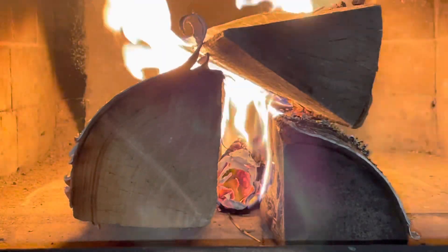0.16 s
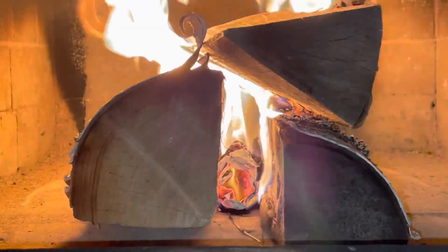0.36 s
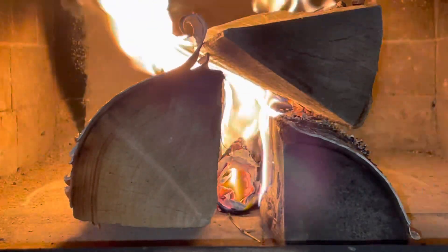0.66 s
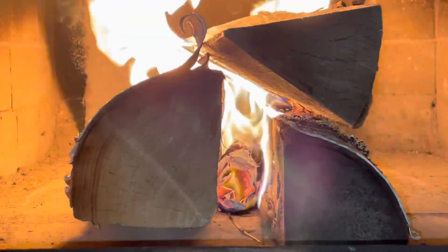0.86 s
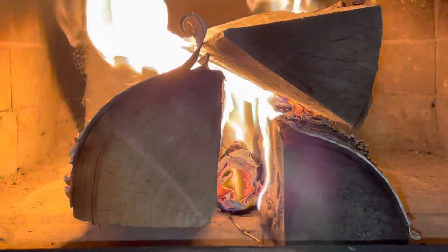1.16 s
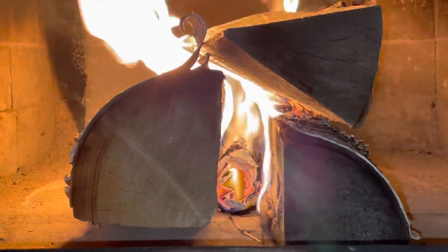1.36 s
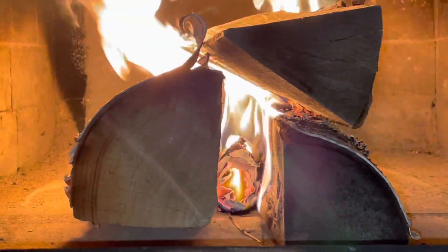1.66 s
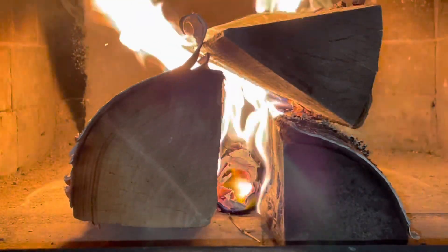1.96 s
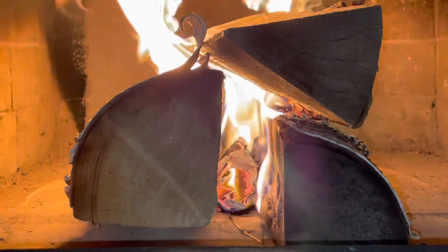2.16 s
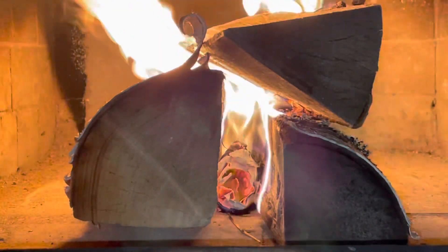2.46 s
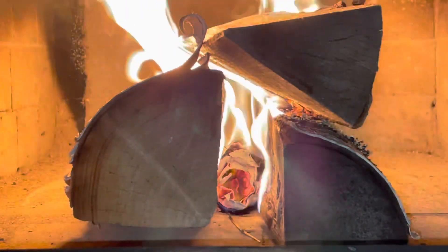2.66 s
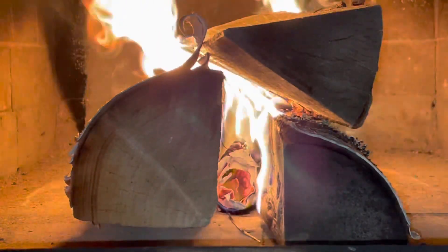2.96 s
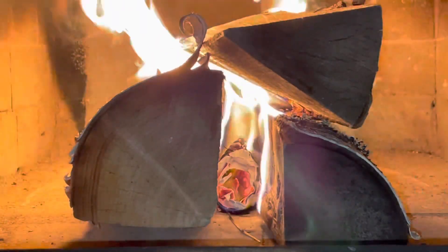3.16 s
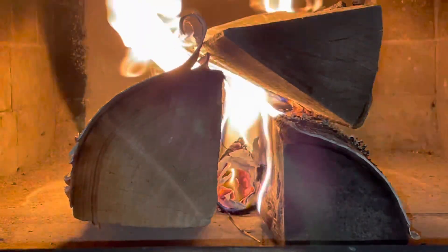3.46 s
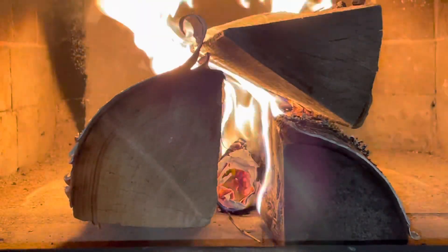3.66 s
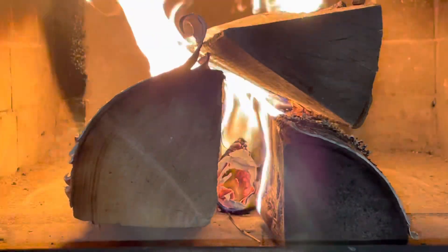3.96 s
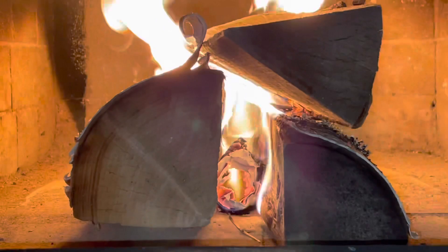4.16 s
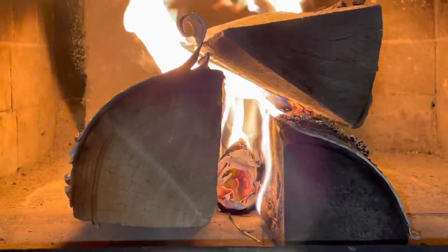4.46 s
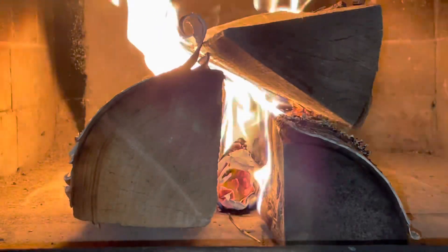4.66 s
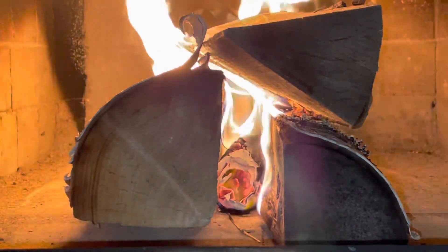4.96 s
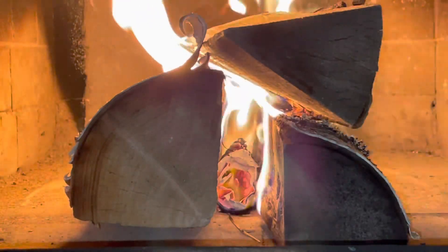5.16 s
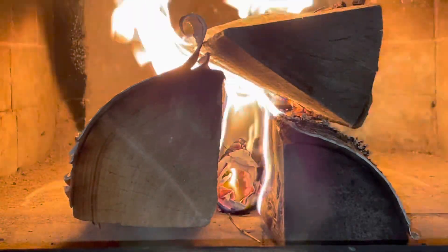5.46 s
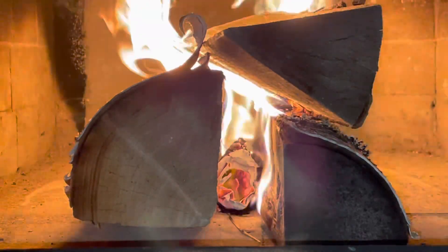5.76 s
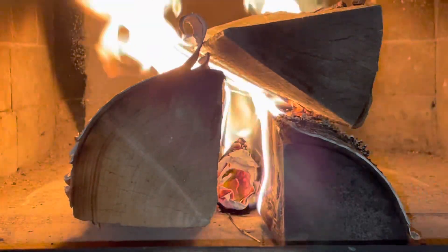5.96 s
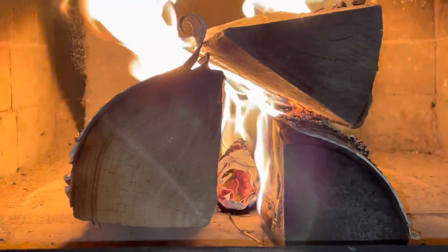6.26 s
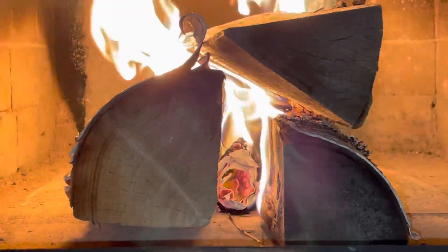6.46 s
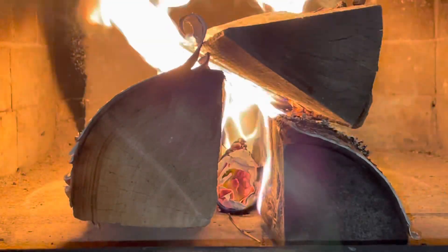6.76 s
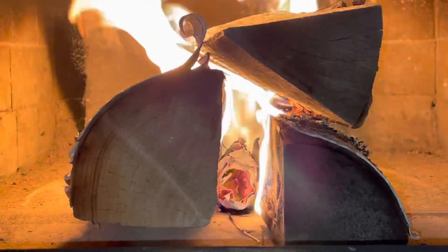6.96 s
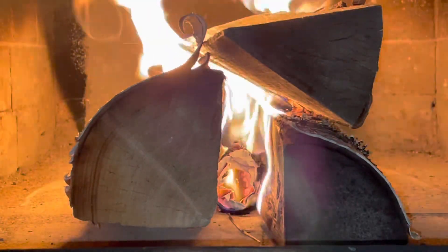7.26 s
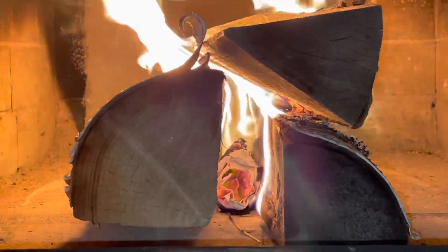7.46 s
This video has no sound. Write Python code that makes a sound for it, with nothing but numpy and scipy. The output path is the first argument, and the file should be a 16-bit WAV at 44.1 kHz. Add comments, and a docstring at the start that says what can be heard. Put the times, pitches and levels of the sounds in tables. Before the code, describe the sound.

Split logs burn close by in an open brick oven for about seven and a half seconds. A low flame rumble runs throughout, fluttering and surging unevenly, over a faint hiss and a soft, rapid, regular ticking. A sharp crackle snaps at 0.2 seconds, followed by a tiny, high, falling steam whistle. Similar faint whistles come near 1.1 and 2.5 seconds. The flames give soft, dull flaps, thickest between 1.2 and 1.8 seconds, with another crackle at 1.6. A brief hissing spurt of gas escapes at 2.8 seconds, then a small snap at 3. The clearest group of dry crackles falls between 4.4 and 5 seconds, with one more at 5.9, each with a very short reflection from the walls. Fainter crackles are scattered in between, and more flaps come from 6.5 to 7.4 seconds as the rumble continues to the end.

```python
"""Split logs burn in the open brick firebox of an oven, close to a phone. From the outset turbulent
flames rumble and flutter in the cavity, gas hisses from hot wood and something ticks softly behind.
Within a quarter second fibres snap in crackles that scatter between the walls, sap steam whistles
faintly and a sheet of flame tears off with a flap. The last whistle fades at 2.7 s, just before
a jet of wood gas spurts; crackles and flaps recur irregularly to the end."""
import sys
import numpy as np
from scipy import signal
from scipy.fft import rfft, irfft
from scipy.io import wavfile
from scipy.ndimage import uniform_filter1d

SR = 44100
rng = np.random.default_rng(int(sys.argv[2]) if len(sys.argv) > 2 else 0)


def inscribe(sig):
    """Save sig as 16-bit PCM at rate SR to the path in sys.argv[1].

    A 1-D sig is mono; a 2-D sig holds one channel per row.
    Samples are clipped to [-1, 1] before scaling.
    """
    pcm = np.round(np.clip(np.atleast_2d(sig).T, -1, 1) * 32767)
    wavfile.write(sys.argv[1], SR, pcm.astype(np.int16))


N = 335160
TIME = np.arange(N) / SR

# resonances and notches of the logs and their gaps (frequency [Hz], width [Hz], lift [dB])
LOG_MODES = [(716, 110, 6), (1530, 110, 2), (2030, 160, 3.5), (2380, 400, 3), (2950, 300, -3),
             (3600, 250, 1.5), (4100, 250, 4), (4700, 200, 4.5), (5020, 140, -7), (5400, 380, 5),
             (5950, 170, -7), (6330, 330, 5), (9070, 1900, 13.5), (11140, 520, -1)]


def undb(db):
    """Amplitude ratio of a level in decibels."""
    return 10 ** (np.asarray(db) / 20)


def unit(x):
    """Normalisation to an rms of 1."""
    return x / np.sqrt(np.mean(x ** 2))


def contour(points, hz):
    """Spectral envelope in dB, interpolated over log frequency."""
    point_hz, db = np.transpose(points)
    return np.interp(np.log(hz + 1), np.log(point_hz), db)


def colour(x, points, modes=()):
    """Minimum-phase filter: a broad envelope with a Lorentzian bump in dB for each resonance."""
    hz = np.fft.rfftfreq(len(x), 1 / SR)
    lift_db = sum(db / (1 + (2 * (hz - centre) / width) ** 2) for centre, width, db in modes)
    cepstrum = irfft(np.log(undb(contour(points, hz) + lift_db)), len(x))
    # folding the cepstrum onto positive time makes the filter causal
    cepstrum[1:len(x) // 2] *= 2
    cepstrum[len(x) // 2 + 1:] = 0
    return irfft(rfft(x) * np.exp(rfft(cepstrum)), len(x))


def walk(per_s):
    """Low-pass random modulation: held values, smoothed twice, with an rms of 1."""
    hold = max(int(SR / per_s), 1)
    steps = np.repeat(rng.standard_normal(N // hold + 1), hold)
    return unit(uniform_filter1d(uniform_filter1d(steps, hold), hold)[:N])


def even(x, span_s):
    """Division by the running rms holds the short-term power steady."""
    return x / np.sqrt(uniform_filter1d(x ** 2, int(span_s * SR)) + 1e-18)


def burst(x, db):
    """Energy normalisation: a transient gets the energy of 12 ms of sound at the given level."""
    return x * undb(db) / np.sqrt(np.sum(x ** 2) / (.012 * SR))


def add(out, start_s, x):
    """Linear superposition of x on out from a given time."""
    i = max(int(start_s * SR), 0)
    out[i:i + len(x)] += x[:N - i]


def flames():
    """Combustion noise: unsteady burning drives the cavity resonances; the tips flutter in puffs."""
    # spectra of the flame body and of the flame tips (frequency [Hz], spectral level [dB])
    rumble_spectrum = [(20, -49), (30, -36), (42, -14), (52, -5.5), (63, -5.5), (82, -5), (99, 1.4),
                       (116, -3), (133, 0), (160, -9), (183, -18.5), (260, -35.5), (500, -70)]
    flutter_spectrum = [(120, -29), (190, -3), (250, -0.5), (295, 2.5), (400, -7), (470, -7), (620, -13.5),
                        (700, -13), (820, -18), (1000, -24), (1500, -23.5), (3000, -50)]
    # standing waves between the brick walls (frequency [Hz], width [Hz], lift [dB])
    box_modes = [(201.7, 20.6, 7), (333.5, 13.7, 4.5), (473, 27, 5), (578, 42, 3), (693, 20, 7.5),
                 (722, 36, 3), (914, 37, 10.5), (1012, 30, 6), (1245, 57, 5.5)]
    # slow strength of the fire (time [s], relative body level [dB], relative tip level [dB])
    blaze = [(0, -44, -55.5), (.45, -41.5, -56.5), (.85, -38, -53), (1.049, -40, -55.5),
             (1.4, -40.5, -55.5), (1.7, -40, -54.5), (1.9, -41.5, -54.5), (2.2, -41, -53.5),
             (2.55, -40, -54.5), (2.92, -41.5, -56), (3.35, -42, -53.5), (3.6, -40.5, -55.5),
             (4.851, -44.5, -56.5), (5.1, -40, -53.5), (5.35, -43.5, -56), (6.0, -42.5, -54.5),
             (6.9, -41.5, -56), (7.6, -43, -56.5)]
    times, body_db, tips_db = np.transpose(blaze)
    body_surge, tips_surge = surges()
    dip_db = lulls()
    body = undb(np.interp(TIME, times, body_db) + dip_db + 2 * walk(per_s=24))
    tips = undb(np.interp(TIME, times, tips_db) + .17 * dip_db + 1.13 * walk(per_s=24))
    rumble = even(colour(rng.standard_normal(N), rumble_spectrum), span_s=.0518)
    puffs = rng.standard_normal(N) * undb(1.46 * walk(per_s=130))
    flutter = even(colour(puffs, flutter_spectrum, box_modes), span_s=.18)
    rumble *= undb(-.36) * np.hypot(body, body_surge)  # blaze and surge add in power
    flutter *= undb(1.61) * np.hypot(tips, tips_surge)
    return rumble + flutter


def surges(attack_s=.013, release_s=.012):
    """Amplitude envelopes of body and tips: a pocket of gas ignites, burns steadily and dies back."""
    # gas pockets (start [s], duration [s], relative body level [dB], relative tip level [dB])
    pockets = [(0.007, 0.039, -45, -55.5), (0.113, .017, -36.5, -62), (0.298, 0.055, -39, -53.5),
               (0.431, 0.077, -42, -52.5), (0.61, 0.031, -33.5, -52.5), (0.763, 0.048, -38.5, -58),
               (0.874, 0.026, -43, -71), (0.931, 0.0091, -30.5, -63), (1.08, 0.011, -42, -64),
               (1.128, 0.018, -38.5, -58), (1.194, 0.079, -35.5, -57.5), (1.403, 0.058, -40, -63),
               (1.509, 0.02, -33, -56), (1.57, 0.0086, -33.5, -52), (1.626, .055, -39, -54),
               (1.743, .012, -42, -66), (1.835, .012, -37.5, -60), (2.02, 0.012, -41, -66),
               (2.363, 0.015, -36, -66), (2.44, 0.059, -36.5, -60), (2.686, 0.093, -33.5, -53),
               (2.816, 0.031, -40, -54.5), (3.048, 0.045, -36, -60), (3.118, 0.022, -38, -59),
               (3.308, 0.043, -39.5, -57), (3.405, 0.048, -37, -58), (3.735, 0.016, -38.5, -61),
               (3.888, 0.021, -44, -73), (4.37, 0.047, -42, -63), (4.49, .02, -38.5, -64),
               (5.027, 0.02, -35, -55), (5.126, .013, -37, -69), (5.186, 0.041, -34.5, -70),
               (5.366, .034, -39, -58), (5.58, 0.036, -41, -61), (5.676, .033, -62, -58),
               (5.723, 0.035, -35.5, -58), (6.05, 0.054, -40, -67), (6.332, 0.0089, -34, -72),
               (6.447, .06, -43, -70), (6.723, .04, -42.5, -55.5), (6.808, 0.058, -41, -55.5),
               (7.043, 0.031, -38, -50), (7.24, 0.048, -38.5, -57), (7.321, 0.02, -38.5, -53),
               (7.39, 0.018, -34, -63), (7.515, .035, -43, -66)]
    body, tips = np.zeros((2, N))
    for start, length, body_db, tips_db in pockets:
        t = np.arange(-attack_s, length + release_s, 1 / SR)
        flare = np.interp(t, [-attack_s, 0, length, length + release_s], [0, 1, 1, 0])
        add(body, start - attack_s, undb(body_db) * flare)
        add(tips, start - attack_s, undb(tips_db) * flare)
    return body, tips


def lulls():
    """Amplitude modulation in dB: between surges the flames sink in rounded troughs."""
    # dips in the burning (start [s], duration [s], depth [dB])
    troughs = [(0.133, .05, -4), (.37, 0.052, -7), (.57, .035, -5), (0.694, 0.03, -12), (0.898, .03, -14),
               (1.032, .04, -4), (1.1, 0.033, -7), (1.153, .03, -6), (1.378, 0.032, -15), (1.54, .03, -4),
               (1.755, 0.032, -10), (1.862, 0.078, -7), (2.047, 0.11, -2.5), (2.65, 0.041, -0.5),
               (2.874, 0.043, -8), (3.17, .1, -5), (3.35, 0.04, -6), (3.549, 0.043, -8), (4.262, .05, -9),
               (4.43, 0.04, -4), (4.537, 0.15, -2), (5.248, 0.068, -4.5), (5.852, 0.052, -10),
               (6.2, .11, -1), (7.01, 0.045, -7)]
    dip_db = np.zeros(N)
    for start, length, depth_db in troughs:
        add(dip_db, start, depth_db * np.sqrt(np.hanning(int(length * SR))))
    return dip_db


def hiss(ticks_per_s=22, tick_decay_s=.0034):
    """Flow noise of gas leaving hot wood, with the shot noise of tiny ticks from the embers."""
    # hiss of hot wood and draught (frequency [Hz], spectral level [dB])
    spectrum = [(300, 1), (900, 4), (1250, -1), (1600, 2), (1830, 6.5), (2250, 4.5), (2600, 1.5),
                (3500, -3), (6000, -5.5), (7200, -6), (8700, -5), (11500, -7.5), (13200, -8.5), (14200, -9),
                (15800, -9.5)]
    # resonances and notches of the hiss (frequency [Hz], width [Hz], lift [dB])
    modes = [(1590, 70, -3.5), (1693, 25, 3), (1836, 42, 5), (1929, 25, 2.5), (2970, 40, 5), (3430, 150, 3),
             (3920, 80, 2), (4160, 220, 5.3), (4540, 130, 1), (5310, 90, 4), (5800, 67, -3),
             (11350, 400, 3.5)]
    gas = unit(colour(rng.standard_normal(N), spectrum, modes))
    gas *= undb(.23 * walk(per_s=2.9) + .76 * walk(per_s=40))
    impulses = (rng.random(N) < ticks_per_s / SR) * rng.standard_normal(N)
    t = TIME[:SR // 40]
    tick = rng.standard_normal(len(t)) * np.exp(-t / tick_decay_s)
    ticks = signal.fftconvolve(impulses, tick)[:N]
    ember_spectrum = [(900, -30), (2200, -4), (5500, 7), (8000, 7), (15000, .5)]
    embers = unit(colour(ticks, ember_spectrum, LOG_MODES))
    return undb(-63) * gas + undb(-81.5) * embers


def rush(spurt_at_s=2.787, spurt_length_s=.06, spurt_db=-55.5):
    """Jet noise: a broad stream of wood gas wavers under the hiss and spurts once."""
    # jet of wood gas (frequency [Hz], spectral level [dB])
    spectrum = [(1000, -24), (1650, -14), (1850, 1.5), (2000, -5), (2200, 2.5), (2350, -13.5), (2600, -2),
                (3200, -16.5), (6000, -32.5)]
    spurt = np.zeros(N)
    add(spurt, spurt_at_s, undb(spurt_db) * np.linspace(1, 0, int(spurt_length_s * SR)))
    jet = unit(colour(rng.standard_normal(N), spectrum))
    waver = undb(-74 + 2.5 * walk(per_s=9))
    return jet * np.hypot(waver, spurt)


def ticking(turns_per_s=15, decay_s=.0041, size=2048):
    """Periodic excitation, perhaps by a fan: knocks recur on every turn, each a damped oscillation."""
    # knocks within one turn (time into the turn [s], mean level [dB], mean frequency [Hz])
    knocks = [(.0015, -62.5, 770), (.032, -71, 770), (0.049, -102, 1170)]
    out, t = np.zeros(N), TIME[:size]
    for offset_s, db, hz in knocks:
        for start in np.arange(offset_s, N / SR, 1 / turns_per_s):
            force_db, detune = rng.standard_normal(2) * (1.2, .015)
            ring = np.sin(2 * np.pi * hz * (1 + detune) * t) * t * np.exp(-t / decay_s)
            add(out, start, burst(ring, db + force_db))
    return out


def crackles(fracture=2.7, size=4096):
    """Impulse excitation: a fibre breaks and tears on, the splinter rings, the walls scatter the snap."""
    # snapping fibres (time [s], relative level [dB], woody knock [dB], treble [dB],
    # splinter resonance [Hz], decay time of the tear [s])
    snaps = [ (0.1595, -64, -9, 3, 6000, .0009), (0.2217, -47.5, -7, 6.5, 5400, 0.003),
             (0.242, -61, -5, 4, 5400, 0.0013), (0.734, -66.5, -5, 1, 5200, 0.002),
             (.868, -63.5, -11, -9, 5260, 0.0022), (1.0762, -67, -22, 3, 5160, 0.00083),
             (1.373, -64, -14, -5, 5290, 0.0035), (1.5315, -71, 0, 2, 5400, .001),
             (1.5714, -53.5, -13, -12, 5900, 0.0043), (1.7455, -75, -2, 5, 5400, .001),
             (1.7953, -72, 0, 6, 4400, .002), (2.306, -61, -14, -10, 6600, 0.002),
             (2.5754, -68.5, -1, 4, 5600, .0012), (2.9721, -58, -3, 3, 5450, 0.00039),
             (2.9977, -71, -6, 5, 5400, .002), (3.131, -75, -3, 6, 5500, .0006),
             (3.2674, -68, -9, 0, 6430, .001), (3.884, -67, -15, -10, 4680, .001),
             (3.9827, -67, 2, 4, 5400, 0.0011), (4.056, -65, -2, -9, 5400, .003),
             (4.3134, -73, -9, 6, 5500, .001), (4.4663, -49, -5, 4.5, 5450, 0.0016),
             (4.623, -53, -6.5, -1.5, 5400, 0.0019), (4.8486, -57, -2, 2.5, 4770, 0.0013),
             (4.8696, -63.5, 3.5, -1, 2300, 0.004), (4.993, -54.5, -7, 0, 5370, 0.0013),
             (5.5473, -63, -3, 2, 5570, .002), (5.7252, -69.5, 5, 4, 2920, .001),
             (5.9323, -56.5, 0, -5, 5600, 0.0043), (6.1238, -66.5, 0, -4, 5200, .0018),
             (6.1603, -64.5, -8, 4, 5530, 0.00078), (6.3574, -68, 3, 1, 3250, .0014),
             (7.018, -69.5, -9, 2, 4160, .001), (7.384, -74, 10.5, -8, 2800, .0013)]
    out, t = np.zeros(N), TIME[:size]
    echo_envelope = undb(-5) * np.exp(-t / .0049) + undb(-35) * np.exp(-t / .035)
    # the soft puffs of hiss pass through the same filters as the snaps
    for start, db, knock_db, treble_db, splinter_hz, tear_s in snaps + hiss_puffs():
        tear, walls = rng.standard_normal((2, size))
        tear *= np.exp(-t / tear_s)
        tear[0] += fracture
        # the small fracture radiates mostly treble; the woody lows come later, from log and walls
        snap = colour(tear, [(2000, -5), (5000, 0)]) + walls * echo_envelope
        knock = [(300, knock_db - 8), (700, knock_db - 2), (1300, knock_db - 2),
                 (2400, knock_db + 5.5), (3500, knock_db + 6)]
        ring = [(4900, 1), (6500, 1)]
        treble = [(9000, treble_db - 9.5), (12000, treble_db - .5), (15800, treble_db - 2), (18000, -24)]
        crackle = colour(snap, knock + ring + treble, LOG_MODES + [(splinter_hz, 550, 3)])
        # knock and treble add their power to that of the ring
        total_db = db + 10 * np.log10(1 + undb(knock_db) ** 2 + undb(treble_db) ** 2)
        add(out, start, burst(crackle, total_db + .5))
    return out


def hiss_puffs(per_s=1.3, count=40):
    """A Poisson process: rows for faint, soft puffs of hiss, each about a tenth of a second long."""
    decay_s = -3.5  # long and negative: the noise stays almost level until it is cut off
    times = np.cumsum(rng.exponential(1 / per_s, count))
    spread = rng.uniform(-.83, 1, (count, 4))
    return [(start, -75 + 3 * level, 1 + 6 * lows, -6 + 6 * treble, 5200 * 1.1 ** pitch, decay_s)
            for start, (level, lows, treble, pitch) in zip(times, spread) if start < N / SR]


def whistles(jitter=.005, wander=.007, sputter_db=3.5):
    """Jet tones: sap steam sputters from the end grain in a fizz, its pitch falling with its pressure."""
    # steam jets (start [s], duration [s], first pitch [Hz], last pitch [Hz], relative level [dB])
    jets = [(.245, .12, 5680, 5200, -72.5), (1.07, .24, 5150, 4570, -76), (1.745, .045, 5840, 5500, -79),
            (2.468, .1, 5880, 5560, -75.5), (2.6, .11, 5920, 5480, -78)]
    out = np.zeros(N)
    fizz_spectrum = [(1500, 0), (5500, -4), (12000, 1), (17000, -33)]
    fizz = undb(1) * unit(colour(rng.standard_normal(N), fizz_spectrum))
    for start, length, first_hz, last_hz, db in jets:
        n = int(length * SR)
        unsteadiness = 1 + jitter * walk(per_s=500)[:n] + wander * walk(per_s=50)[:n]
        hz = np.linspace(first_hz, last_hz, n) * unsteadiness
        tone = np.sin(2 * np.pi * np.cumsum(hz) / SR) * undb(sputter_db * walk(per_s=70)[:n])
        add(out, start, undb(db) * (tone + fizz[:n]) * signal.windows.tukey(n, .25))
    return out


def flaps(push=2.6, rise_s=.0008, decay_s=.005, size=4096):
    """A pressure pulse: a sheet of flame tears off with one push of gas, then eddies swell and decay."""
    # flaps, a dull thud if steep, a papery slap if flat; the row at 1.339 s is instead one stronger knock of
    # the ticking # (time [s], relative level [dB], spectral slope [dB/octave])
    sheets = [(.249, -45, -15), (0.289, -45.5, -9.5), (.450, -54, -5), (.784, -47, -17),
              (1.184, -43.5, -17.5), (1.253, -41.5, -23), (1.339, -55, -4), (1.353, -41.5, -19),
              (1.462, -41.5, -13.5), (1.508, -46, -18), (1.622, -38.5, -24), (1.641, -48.5, -8),
              (1.659, -51, -9), (1.711, -42, -18.5), (1.834, -52, -4.5), (2.007, -65, -11),
              (2.13, -48.5, -12), (2.228, -43, -28), (2.361, -48.5, -4), (2.449, -44, -13.5),
              (2.722, -44, -17), (3.064, -47, -15), (3.105, -43, -16), (3.206, -56, -7), (3.732, -48, -19),
              (4.4, -48, -14), (4.466, -57, -4.5), (4.722, -56, 5), (4.869, -53, -6.5),
              (4.99, -44.5, -13.5), (5.031, -43.5, -22), (5.931, -56, 1.5), (6.513, -47, -9),
              (6.637, -58, -7), (6.653, -48.5, -5.5), (6.811, -54, -4), (7.16, -41, -21), (7.303, -46, -13),
              (7.382, -50, -7)]
    # hollow ring of the gaps between the logs (frequency [Hz], width [Hz], lift [dB])
    gap_modes = [(530, 150, -1.5), (730, 110, 4.5), (1080, 110, 1), (1270, 140, 3.5)]
    low_hz, high_hz = 272, 1230  # the slope holds between these
    out, t = np.zeros(N), TIME[:size]
    for start, db, slope in sheets:
        pulse = rng.standard_normal(size) * np.exp(-t / decay_s) * (1 - np.exp(-t / rise_s))
        pulse[0] += push
        top_db = slope * np.log2(high_hz / low_hz)
        spectrum = [(60, -20), (170, 0), (low_hz, 0), (high_hz, top_db),
                    (2200, top_db - 22), (8000, top_db - 39)]
        add(out, start, burst(colour(pulse, spectrum, gap_modes), db - .7))
    return out


def burning():
    """Superposition of all the sounds of the fire, with fresh noise at each call."""
    return flames() + flaps() + hiss() + rush() + crackles() + whistles()


def scene():
    """Mid-side stereo: the fire lies ahead, in phase; a second draw of it in antiphase gives width."""
    # stereo width: wide near 1-2 kHz and 12 kHz, centred from 2.5 to 7 kHz
    # (frequency [Hz], side level against mid [dB])
    width = [(40, -37), (100, -23), (300, -16.5), (480, -11.5), (620, -4.5), (740, -2.5), (950, -2),
             (1250, -7), (1720, 0), (1950, -8.5), (2500, -38), (5800, -56), (7000, -52), (12500, -6.5),
             (15000, -23)]
    # slight lean of the rumble to the right (frequency [Hz], left minus right [dB])
    lean = [(60, -.5), (125, -.9), (250, 0)]
    hz = np.fft.rfftfreq(N, 1 / SR)
    polarity = np.array([[1], [-1]])
    share = undb(contour(width, hz))
    balance = undb(polarity * contour(lean, hz) / 2)
    mid, side = rfft(burning()), rfft(burning())
    fire = balance * (mid + polarity * share * side) / np.sqrt(1 + share ** 2)
    return irfft(fire, N) + ticking()


def record(dry, fade_s=.006, cutoff_hz=16200):
    """Phase difference: the phone's two ports fall out of step in the treble; end fades, a low-pass."""
    # phase between the microphone ports (frequency [Hz], lead of the left [rad])
    port_phase = [(0, 0), (6000, 0), (7200, -1.5), (8000, -np.pi), (8350, -np.pi), (9400, -4.5),
                  (10800, -6), (12200, -6.5), (13400, -7.6), (14500, -3 * np.pi), (16000, -3 * np.pi)]
    lead = np.interp(np.fft.rfftfreq(N, 1 / SR), *np.transpose(port_phase))
    ports = irfft(rfft(dry) * np.exp(.5j * lead * np.array([[1], [-1]])), N)
    fade = np.minimum(np.minimum(TIME, TIME[::-1]) / fade_s, 1)
    low_pass = signal.ellip(10, .2, 80, cutoff_hz, fs=SR, output="sos")
    return signal.sosfilt(low_pass, ports * fade)


dry = scene()
out = record(dry)
inscribe(out)
```